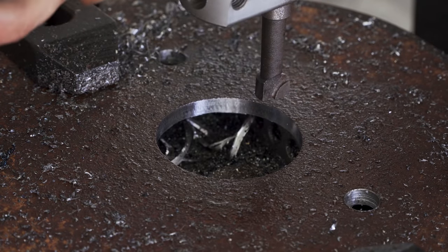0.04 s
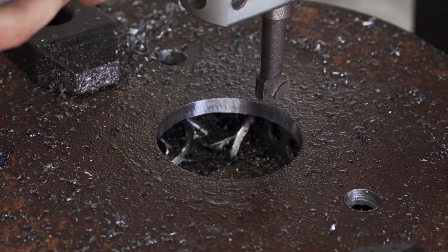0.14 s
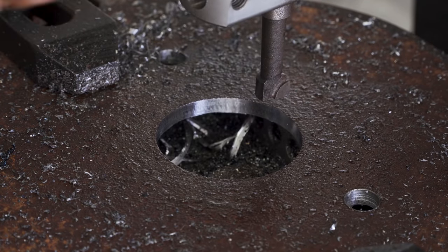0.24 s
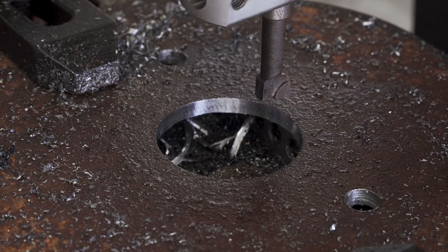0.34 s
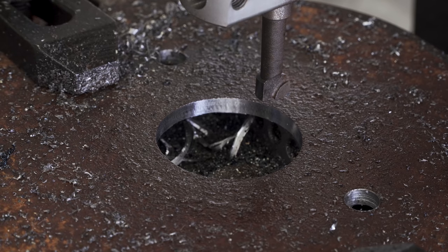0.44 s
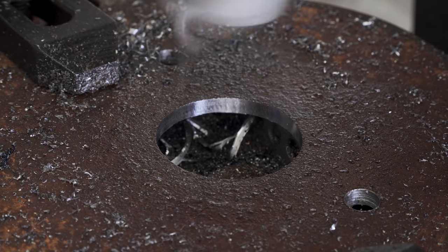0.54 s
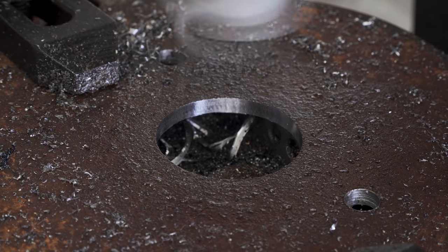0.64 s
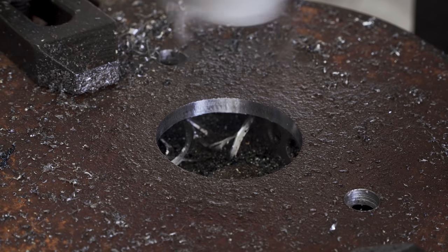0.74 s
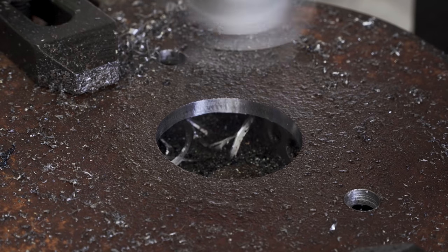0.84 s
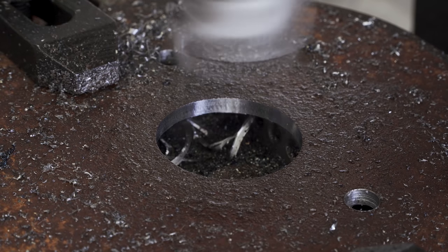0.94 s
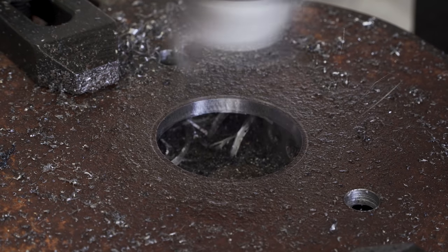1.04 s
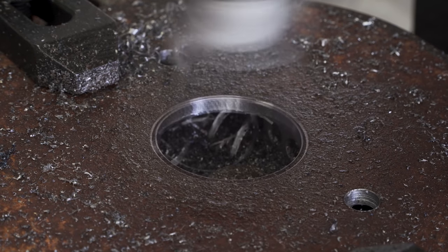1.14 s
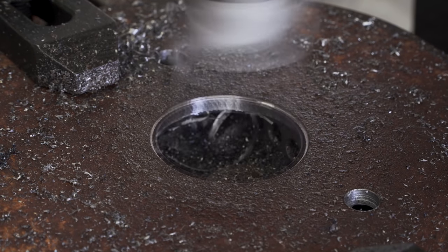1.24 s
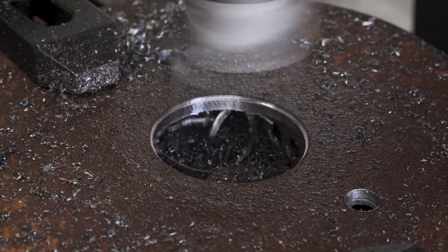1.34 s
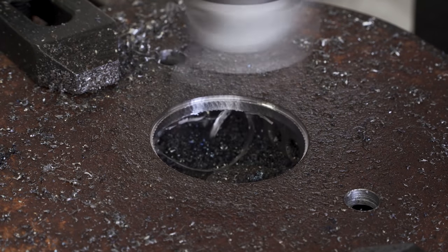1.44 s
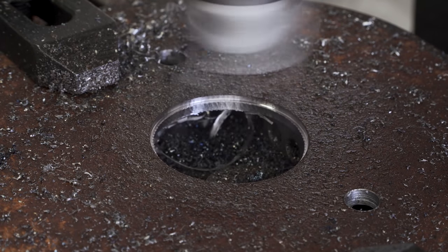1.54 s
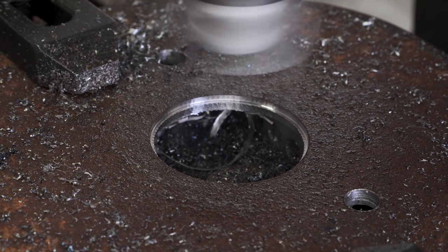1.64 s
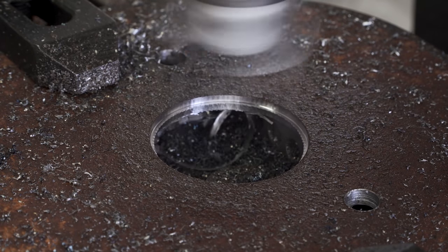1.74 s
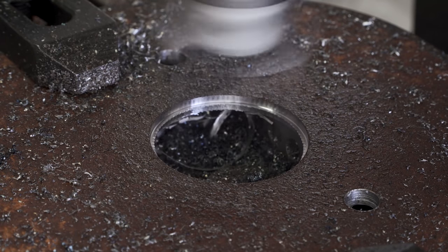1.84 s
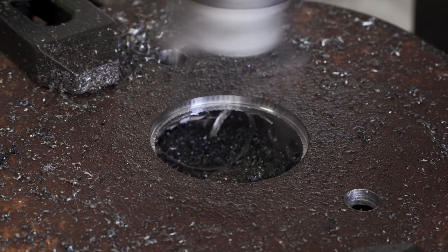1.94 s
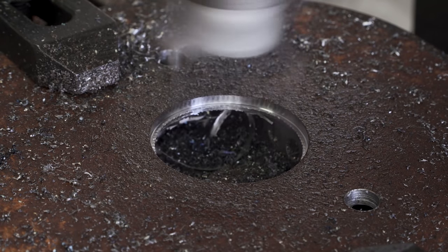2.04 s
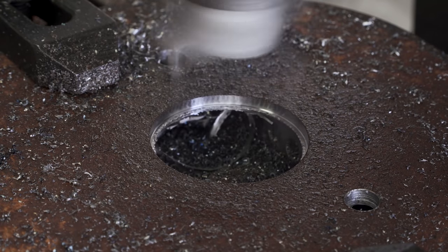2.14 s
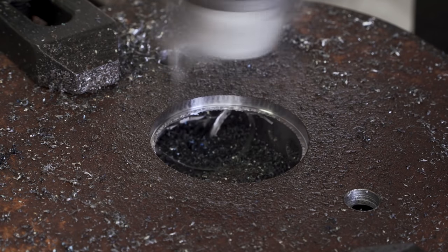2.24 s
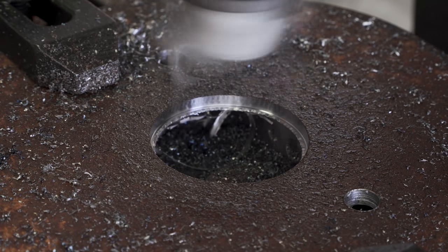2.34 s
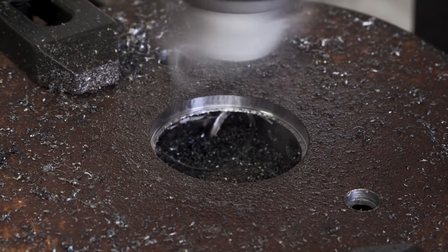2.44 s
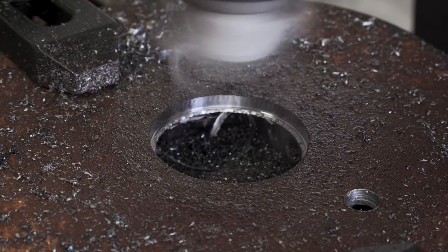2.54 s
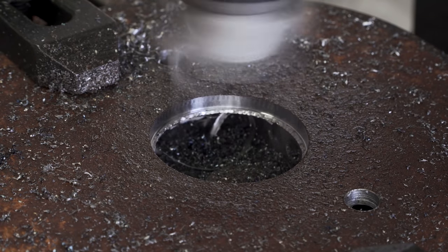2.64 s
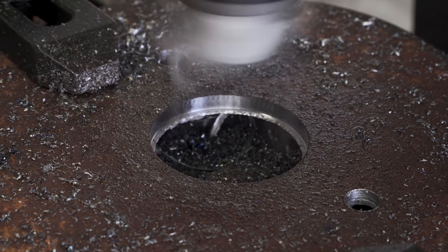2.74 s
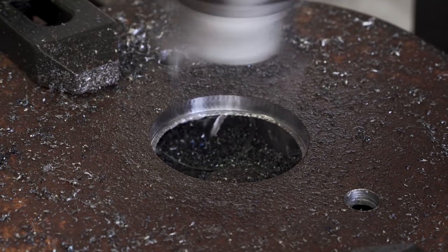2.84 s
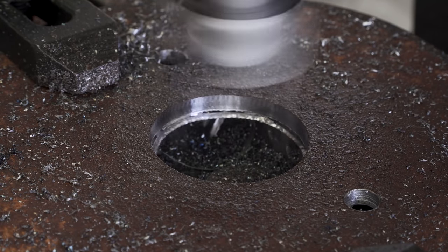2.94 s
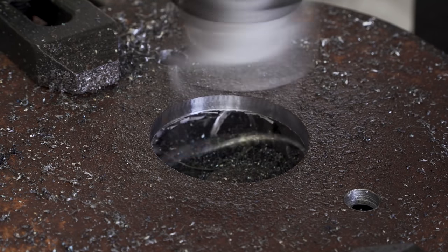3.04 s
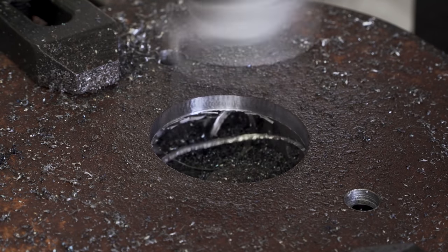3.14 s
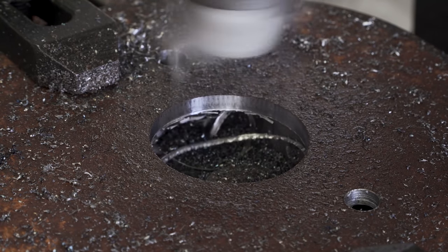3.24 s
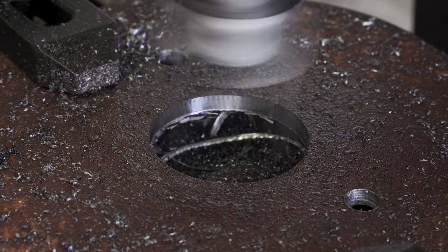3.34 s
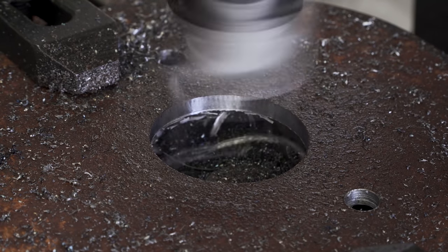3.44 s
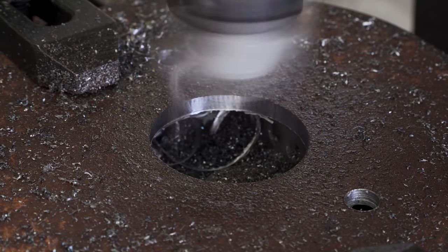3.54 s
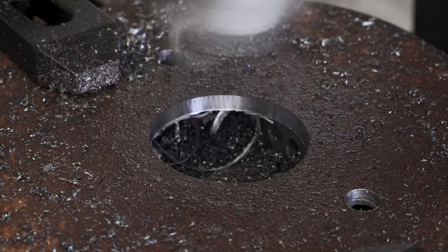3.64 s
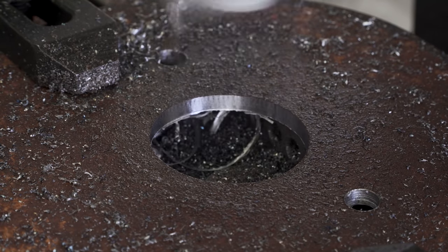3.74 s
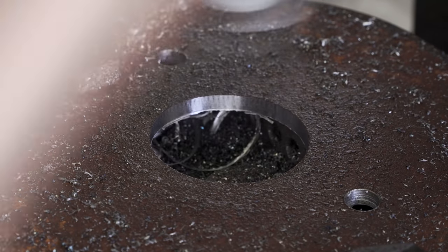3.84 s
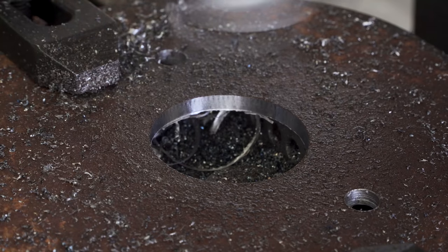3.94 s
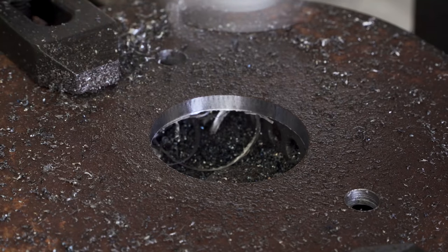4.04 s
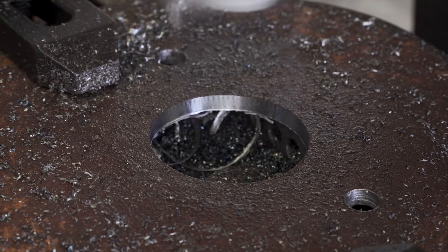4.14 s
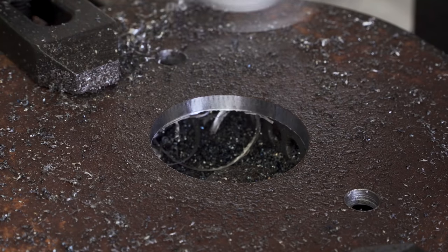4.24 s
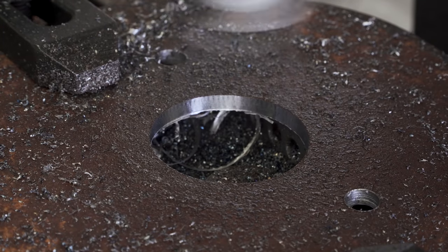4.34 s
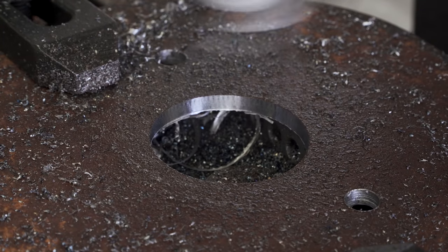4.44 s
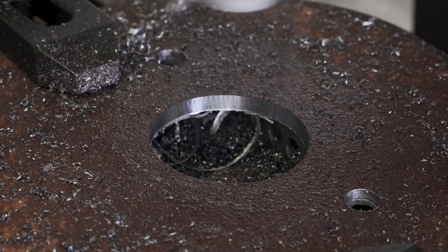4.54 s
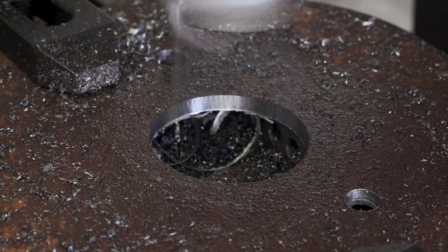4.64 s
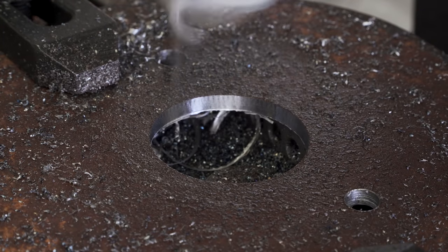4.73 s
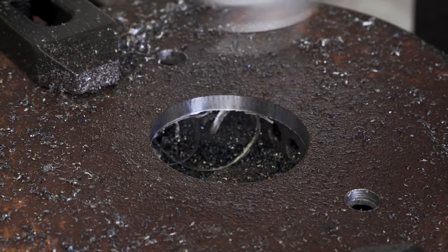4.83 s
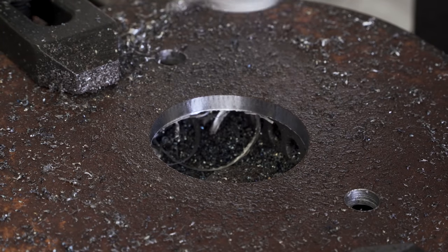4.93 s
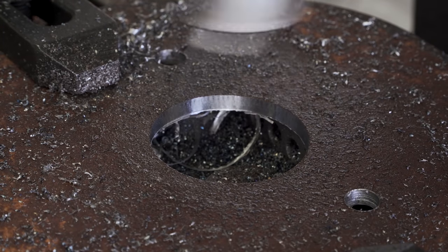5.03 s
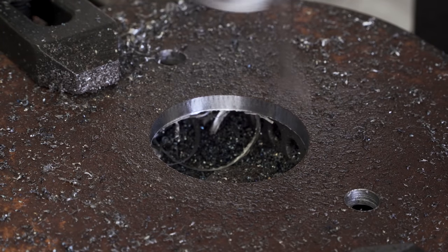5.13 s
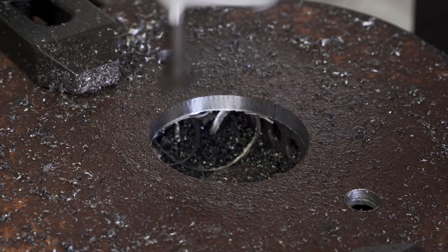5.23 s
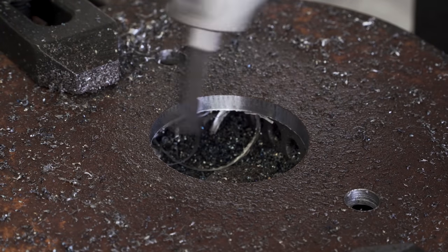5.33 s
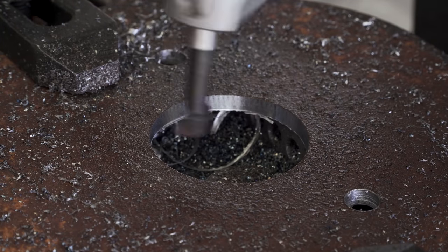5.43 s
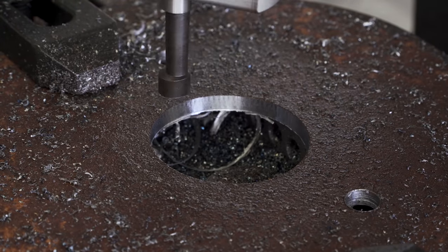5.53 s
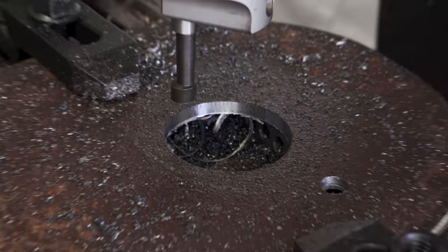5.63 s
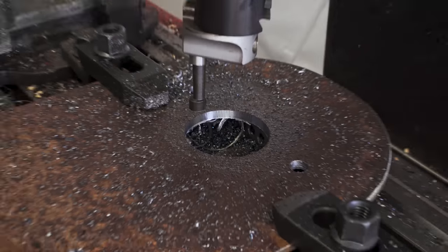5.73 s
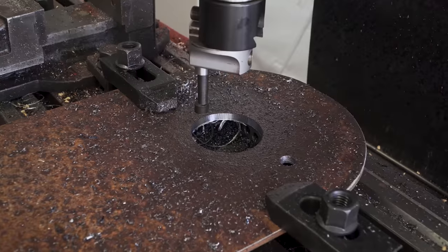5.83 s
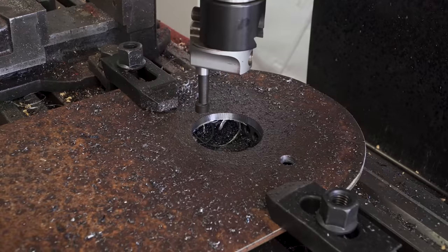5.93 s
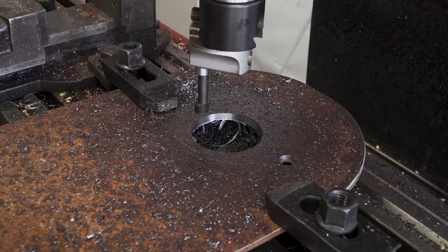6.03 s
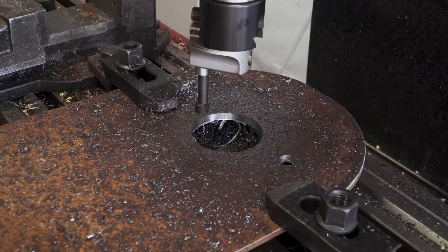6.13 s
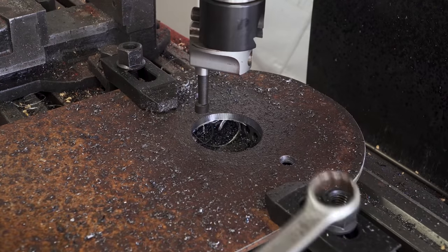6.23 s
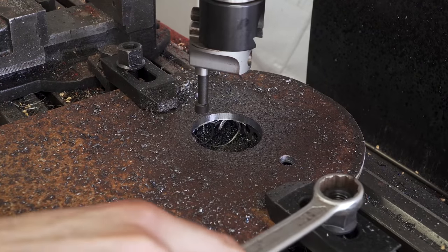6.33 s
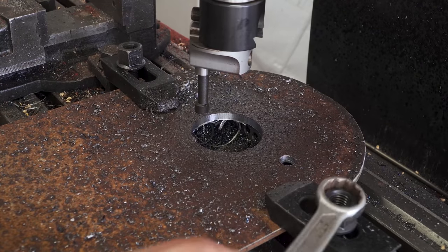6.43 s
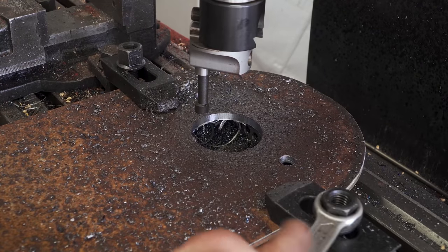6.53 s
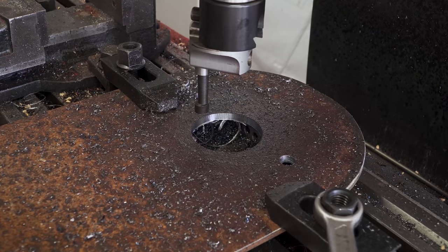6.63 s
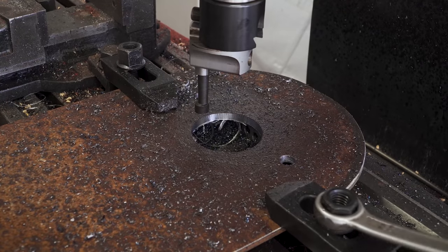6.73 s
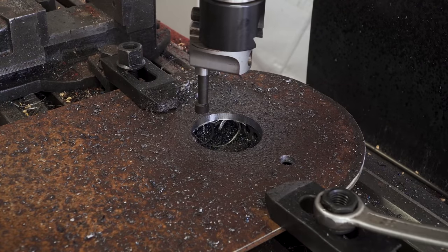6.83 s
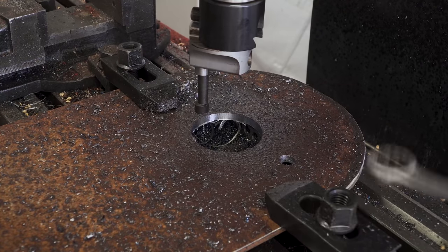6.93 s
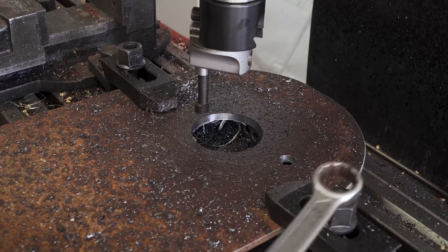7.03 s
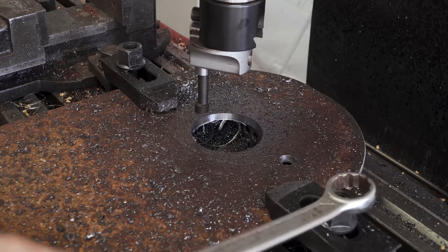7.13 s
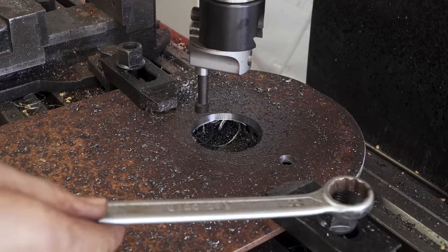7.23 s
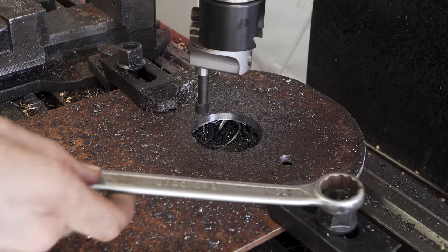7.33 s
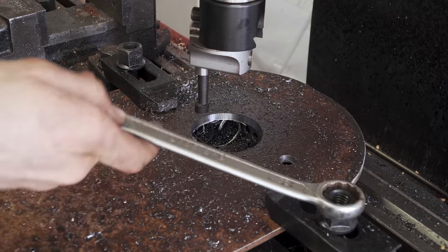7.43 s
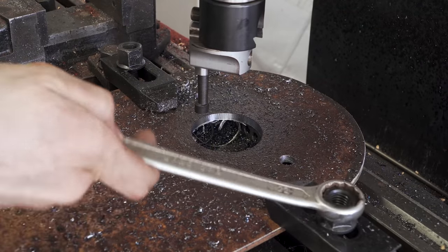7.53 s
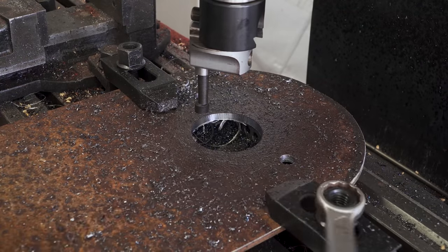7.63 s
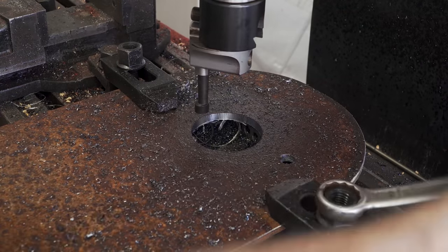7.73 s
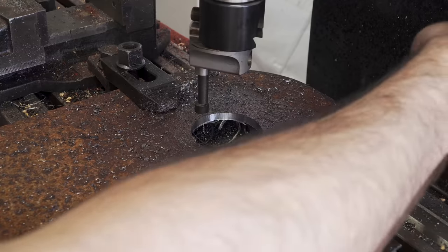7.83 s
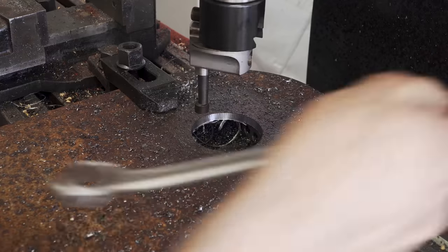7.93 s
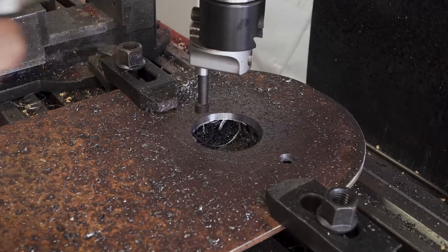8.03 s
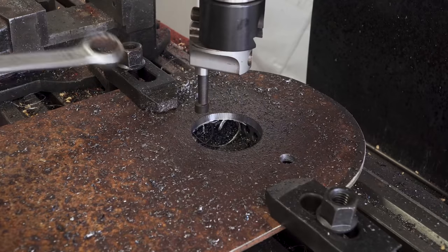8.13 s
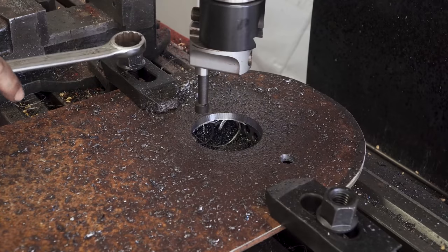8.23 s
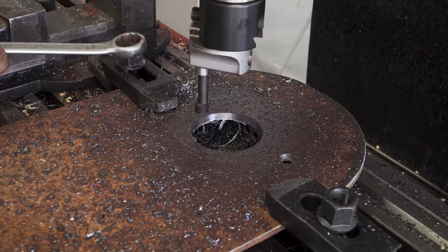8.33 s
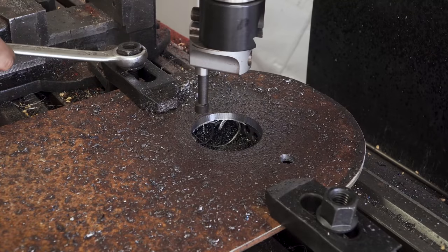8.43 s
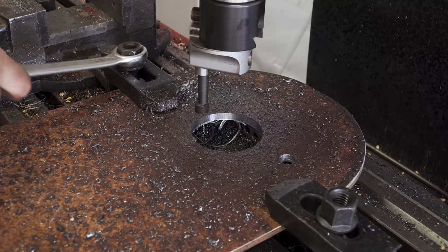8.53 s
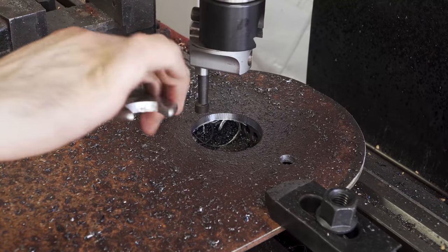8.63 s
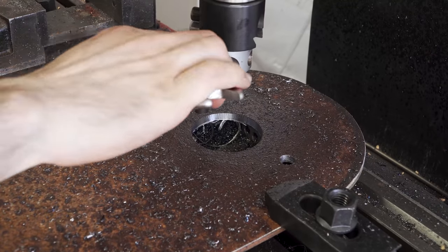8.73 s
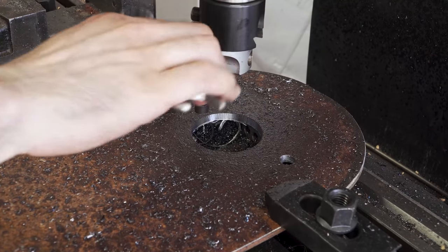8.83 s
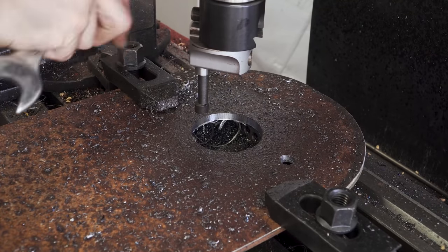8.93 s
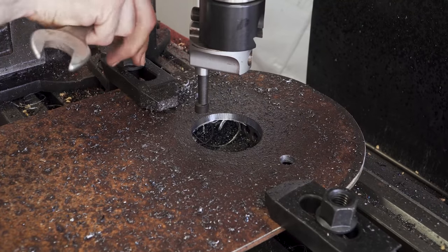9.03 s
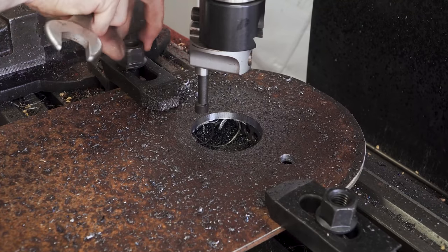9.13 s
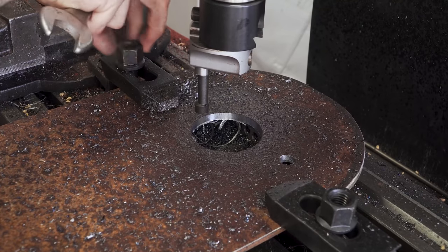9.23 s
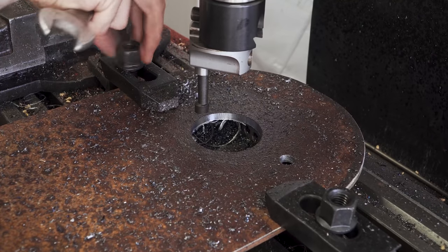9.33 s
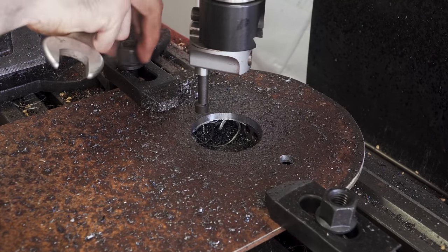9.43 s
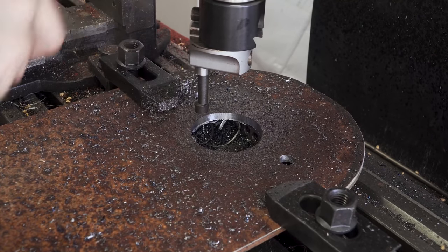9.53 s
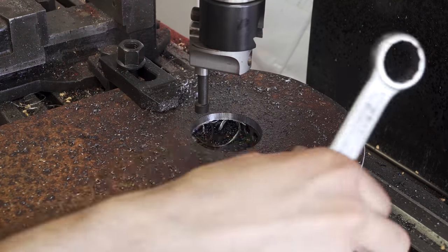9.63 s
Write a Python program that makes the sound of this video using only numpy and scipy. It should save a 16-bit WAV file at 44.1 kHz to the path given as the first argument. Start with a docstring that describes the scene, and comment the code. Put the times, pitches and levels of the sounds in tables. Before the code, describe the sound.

A geared milling spindle jolts on, bores steel with a high squeal, coasts down howling, then a low rumble and bright spanner clinks on clamp nuts.

```python
"""A small workshop, heard close and almost mono: a geared milling spindle jolts into motion, bores a steel plate
with a high squeal and coasts to a stop. One motor speed steers its mesh tones, gear noise, squeal and howls.
A short low rumble follows, made of a wavering tone and low noise. Then a ring spanner is fitted to the clamp
nuts: clinks made of ringing modes and dense noise, a singing shank and faint sliding friction.
Workshop air and a faint hum lie beneath."""
import sys
import numpy as np
from scipy import signal
from scipy.fft import rfft, irfft
from scipy.io import wavfile

SR = 44100
rng = np.random.default_rng(int(sys.argv[2]) if len(sys.argv) > 2 else 0)


def waveform_to_disk(signal):
    """Save audio, clipped to [-1, 1], as 16-bit WAV at the path in sys.argv[1]."""
    frames = np.transpose(np.atleast_2d(signal))
    scaled = np.clip(frames, -1, 1) * 32767
    samples = np.round(scaled).astype(np.int16)
    wavfile.write(sys.argv[1], SR, samples)


N = 426447
T = np.arange(N) / SR
HZ = np.fft.rfftfreq(N, 1 / SR)


def amp(db):
    """Decibels to gain."""
    return 10 ** (np.asarray(db) / 20)


def unit(x):
    """Scales to rms 1."""
    return x / np.sqrt(np.mean(x ** 2) + 1e-20)


def read(points, hz):
    """Reads a spectrum table on a log-frequency axis."""
    f, value = np.transpose(points)
    return np.interp(np.log(hz + 1), np.log(f + 1), value)


def during(start, end, fade=0.0096):
    """1 between two times, with ramps inside."""
    return np.clip((T - start) / fade, 0, 1) * np.clip((end - T) / fade, 0, 1)


def ramp(start, length):
    """Rises from 0 to 1."""
    return np.clip((T - start) / max(length, 1e-4), 0, 1)


def envelope(start, attack, hold, release):
    """Attack, hold and release in seconds, from 0 to 1 and back."""
    return ramp(start, attack) - ramp(start + attack + hold, release)


def coloured(x, db):
    """Filters by a gain at each frequency; rms 1."""
    return unit(irfft(rfft(x) * amp(db), N))


def band(x, lo_hz, hi_hz):
    """Band-pass without delay."""
    edges = [lo_hz, min(hi_hz, SR / 2 - 1)]
    return signal.sosfiltfilt(signal.butter(4, edges, "band", fs=SR, output="sos"), x)


def drift(rate_hz):
    """Slow random motion of rms 1."""
    return unit(irfft(rfft(rng.standard_normal(N)) * np.exp(-(HZ / rate_hz) ** 2), N))


def wander(knots):
    """Two random curves, straight between knots: one for level, one for phase."""
    return [np.interp(T, knots, v) for v in rng.standard_normal((2, len(knots)))]


def add(mix, s, sound):
    """Mixes a sound in at a time."""
    part = mix[max(round(s * SR), 0):][:len(sound)]
    part += sound[:len(part)]


# motor switched on, switched off, spindle silent
ON_S, OFF_S, REST_S = .561, 4.3, 5.585
# speed running free and in the cut, in turns per second
FREE_HZ, LOADED_HZ = 132.65, 129.4
# mesh tones running free, high and low: [pitch_hz, level_db (relative)]
FREE_TONES = [(398.4, -57.5), (495.3, -58.5), (791.3, -40.5), (1680, -54), (3068, -45.5), (3171, -49.5),
              (3268, -55), (3418, -49), (3736, -62.5), (3935, -45), (4221, -58.5), (4484, -40.5),
              (4619, -47.5), (5259, -40.5), (5572, -44), (5701, -43.5), (5766, -54.5), (5835, -71),
              (5970, -49.5), (6368, -46), (6788, -59), (7472, -63.5), (7607, -50.5), (7736, -61),
              (9157, -51.5), (10325, -46.5)]
LOW_TONES = [(199, -70.5), (595, -58.5), (694, -62), (892, -70.5), (991, -61)]
# mesh tones under load: [pitch_hz, level_db (relative)]
LOAD_TONES = [(388, -63), (485, -64.5), (781, -50), (2993, -52.5), (3397, -51), (3844, -60), (4113, -48),
              (4371, -47.5), (4511, -41.5), (4996, -47), (5125, -63.5), (5696, -47.5), (6379, -59),
              (6514, -39.5), (6634, -46.5), (7435, -55), (7564, -83)]


def spindle(tone_opening_db=16, free_db=-2.5, loaded_db=2):
    """One motor speed drives the gear tones, the gear noise and the cut."""
    load = envelope(start=1.1, attack=.1, hold=1.48, release=.24)
    # the opening is much louder, sinking slightly, then the level drops
    opening_level = envelope(start=0.5375, attack=0.057, hold=0.513, release=0.098) * (1 - 0.29 * (T - ON_S))
    speed = motor_speed(load)
    turns = np.cumsum(speed * (1 + 0.00032 * drift(12))) / SR
    # the mesh tones sound only while the motor drives the teeth
    strength = amp(tone_opening_db * opening_level) * during(0.613, 4.36, 0.055)
    free = amp(free_db) * (1 - load) * gear_tones(FREE_TONES + LOW_TONES, turns, FREE_HZ, flutter=0.17)
    loaded = amp(loaded_db) * load * gear_tones(LOAD_TONES, turns, LOADED_HZ, flutter=0.62)
    # late in the free run the gears grow 2.5 dB louder
    late_lift = amp(2.5 * ramp(3.92, .2))
    gears = (gear_noise(turns, speed, opening_level, load) + strength * (free + loaded)) * late_lift
    settle_s = 0.27
    turning = ramp(ON_S, .01) - ramp(REST_S - settle_s, settle_s)
    return (gears + howls(turns) + whines(turns)) * turning + cutter(turns, load) + jolt()


def motor_speed(load, run_up_s=.018, drag_s=2.5, friction_hz_per_s=69.2):
    """Turns per second: a quick run-up, a sag in the cut, then oil drag and dry friction; never under 1."""
    run_up = 1 - np.exp(-np.maximum(T - ON_S, 0) / run_up_s)
    driven = run_up * (FREE_HZ + (LOADED_HZ - FREE_HZ) * load)
    friction = friction_hz_per_s * drag_s
    return np.maximum((driven + friction) * np.exp(-np.maximum(T - OFF_S, 0) / drag_s) - friction, 1)


def gear_tones(tones, turns, running_hz, flutter=.35):
    """Mesh tones follow the motor; the high ones flutter most as the teeth seat unevenly."""
    knots = np.arange(0, T[-1] + .1, 1 / 40)
    out = np.zeros(N)
    for hz, db in tones:
        swell, slip = wander(knots)
        depth = flutter * np.clip(hz / 2500, .5, 1)
        phase = 2 * np.pi * (hz / running_hz * turns + rng.random())
        out += amp(db) * (1 + depth * swell) * np.cos(phase + depth * slip)
    return np.sqrt(2) * out


# gear noise as rattle, mesh and fizz: [from_hz, to_hz, level_db (relative, running free), opening_db, cutting_db,
# slack_db (the last three are added at full opening level, load or slack), speed_power (exponent)]
GEAR_BANDS = [(60, 2360, -42.5, 17.5, -1.5, 0.5, -0.4), (1960, 6180, -33, 17.5, -1.5, 5, 1.04),
              (6210, 19000, -38.5, 16, 4, 1.5, 1.4)]


def gear_noise(turns, speed, opening_level, load, grain_db=0.5, flicker_db=0.57, throb=0.14, ripple_db=3.0):
    """A dense hail of tooth impacts, throbbing once a turn, rings the casing; slower gears hiss less."""
    roughness = amp(grain_db * drift(700) + flicker_db * drift(40))
    impacts = rng.standard_normal(N) * roughness * (1 + throb * np.cos(2 * np.pi * turns))
    # countless small modes ripple the response
    knots = np.arange(0, SR / 2, 25)
    ripple = ripple_db * np.interp(HZ, knots, rng.standard_normal(len(knots)))
    ring = coloured(impacts, casing_db(HZ) + ripple)
    # unpowered, the teeth go slack
    slack = ramp(OFF_S, .33)
    out = np.zeros(N)
    for lo_hz, hi_hz, db, opening_db, cut_db, slack_db, power in GEAR_BANDS:
        level_db = db + opening_db * opening_level + cut_db * load + slack_db * slack
        out += amp(level_db) * (speed / FREE_HZ) ** power * unit(band(ring, lo_hz, hi_hz))
    return out


# the casing's broad colour: [pitch_hz, level_db (relative, per Hz)]
CASING = [(59, -61.5), (100, -29), (358, -34), (389, -15.5), (705, -14), (784, -3), (1030, -9),
          (1720, -8.5), (2220, -13), (3860, -2.5), (4110, -2), (5420, -4), (8640, -16), (10500, -20),
          (16000, -36)]
# the casing's resonances: [pitch_hz, width_hz, boost_db]
CASING_MODES = [(773, 21, 4), (930, 53, 4.5), (1097, 65, 3.3), (1370, 26, 1), (1560, 80, 3.8),
                (2467, 70, 8.1), (2705, 130, 8.5), (2948, 150, 5.7), (3700, 260, 6.2), (3840, 90, 5.3),
                (4310, 200, 4.1), (5144, 265, 3.5), (5750, 190, 1.9), (6330, 460, 3), (7600, 80, 1.9),
                (10400, 270, 4.1)]


def casing_db(hz):
    """The casing's response: a broad colour with resonances on it."""
    return read(CASING, hz) + sum(db / (1 + (2 * (hz - f) / width) ** 2) for f, width, db in CASING_MODES)


# partials of the tool's squeal: [multiple (of the motor speed), level_db (relative)]
SQUEAL = [(92, -21), (93, -14), (94, -5), (95, -3), (96, -3), (97, 0), (98, -14), (99, -20)]
# when the tool squeals: [start_s, attack_s, hold_s, dying_s, level_db (before flicker and rasp)]
SQUEALS = [(1.038, 0.079, 0.71, .1, -24), (3.15, 0.025, .005, 0.011, -36.5), (3.25, 0.022, .01, 0.077, -38),
           (3.67, 0.02, .005, 0.0089, -37)]
# the tip brushes the rim on its way out: [start_s, attack_s, hold_s, hiss_db, hum_db]
BRUSHES = [(2.682, 0.33, .04, -40, -80), (3.123, 0.014, 0.041, -47, -60), (3.255, .015, 0.13, -47.5, -56.5),
           (3.653, .015, 0.029, -46, -62)]


def cutter(turns, load, sweep=0.4, rasp_db=-9, dying=1.54, cut_hum_db=-54.5):
    """The boring bar squeals in one short chirp a turn; the load hums and the tip brushes the rim."""
    angle = 2 * np.pi * turns
    # phases growing with the square of the order spread each pulse into a chirp
    partials = [amp(db) * np.cos(round(k) * angle + sweep * (i - len(SQUEAL) / 2) ** 2)
                for i, (k, db) in enumerate(SQUEAL)]
    rasp = unit(band(rng.standard_normal(N), 12000, 12750) * (1 + np.cos(angle)))
    squeal = unit(sum(partials)) * amp(drift(40.6)) + amp(rasp_db) * rasp
    hum = unit(np.cos(angle) + amp(-4.5) * np.sin(2 * angle)) * amp(0.89 * drift(25))
    hiss = unit(band(rng.standard_normal(N), 11600, 15800) * (1 + 0.56 * np.cos(angle)))
    out = amp(cut_hum_db) * load * hum
    for start, attack, hold, dying_s, db in SQUEALS:
        after = np.maximum(T - start - attack - hold, 0)
        out += amp(db) * ramp(start, attack) / (1 + after / dying_s) ** dying * squeal
    for start, attack, hold, hiss_db, hum_db in BRUSHES:
        touch = envelope(start, attack, hold, release=.02)
        out += touch * (amp(hiss_db) * hiss + amp(hum_db) * hum)
    return out * during(ON_S, OFF_S)


def jolt(start=.561, t60=0.19):
    """The gears take up their slack with one bang: coloured noise with a sharp onset and a decay."""
    age = np.maximum(T - start, 0)
    colour = [(100, -30.5), (280, -6.5), (600, -4), (850, 2.5), (1500, -4), (2700, 3.5),
              (5000, -10.5), (9000, -21.5), (16000, -42.5)]  # Hz, dB
    bang = coloured(rng.standard_normal(N), read(colour, HZ))
    return amp(-11.0) * bang * np.minimum(age / 0.00072, 1) * amp(-60 * age / t60)


# howls of the back flanks: [multiple (of the motor speed), level_db (before swelling), loudest_s, spread_s]
HOWLS = [(1, -66, 4.45, .15), (3, -62, 4.35, .12), (4, -59, 4.4, .17), (6, -59, 4.75, .15),
         (24, -35, 4.6, .045), (24, -43, 4.55, .11), (36, -41, 4.52, .1), (43, -37, 4.45, .16),
         (43, -34, 4.69, .035), (47, -40, 4.72, .08), (52, -42, 4.55, .2), (57, -39, 4.65, .15)]


def howls(turns):
    """Unpowered, the gears howl on their back flanks: rough, falling tones swell and fade."""
    knots = np.arange(0, T[-1] + .1, 1 / 90)
    out = np.zeros(N)
    for multiple, db, s, spread in HOWLS:
        swell, slip = wander(knots)
        size = amp(db + 2 * swell) * np.exp(-((T - s) / spread) ** 2 / 2)
        out += size * np.cos(2 * np.pi * multiple * turns + .7 * slip)
    return np.sqrt(2) * out * during(4.3, 5.4, .05)


def whines(turns, count=64, uneven_db=5, rough=0.58, level_db=-37.5):
    """Slack tooth errors repeat every turn: multiples of the speed glide down through the casing's resonances."""
    sizes = amp(uneven_db * rng.standard_normal(count)) * np.exp(2j * np.pi * rng.random(count))
    one_turn = irfft(np.append(0, sizes), 4096)
    errors = np.interp(turns % 1, np.arange(len(one_turn)) / len(one_turn), one_turn)
    whine = coloured(errors * (1 + rough * drift(40)), casing_db(HZ))
    return amp(level_db) * envelope(start=4.3, attack=0.064, hold=0.48, release=0.66) * whine


# steel touching steel, mostly the spanner: [start_s, level_db (peak, taken as 11 dB above the first 5 ms' rms),
# low_db, treble_db (shares of the power aimed for), rebound_s (delay; only those over 3 ms sound)]
CLINKS = [(.108, -44, -10, -28, 0), (.1825, -42.5, -8, -30, 0), (5.623, -43, -11, -4, 0.0026),
          (6.32, -8.5, -33, -5.5, .0065), (6.3394, -19, -24, -16, 0.0091), (6.3764, -21, -23, -3, 0),
          (6.3849, -15, -16, -9, 0.0024), (6.3984, -14.5, -7.5, -20, 0), (6.4874, -15, -17, -21, 0),
          (6.4969, -5, -27, -11, 0.00072), (6.516, -4.5, -8.5, -15.5, 0.0063), (6.868, -22.5, 1, -23, 0),
          (6.906, -29, -6, -5, 0), (6.95, -11, -11.5, -13, 0), (7.0897, -7, -22, -5.5, .006),
          (7.1247, -14.5, -10.5, -5, 0.0052), (7.148, -16, -13, 0, 0), (7.1696, -18, -10, -12, 0.019),
          (7.32, -20, -11, -7, 0.0064), (7.3326, -7, -10, -9.5, 0.0083), (7.3696, -17, -11, -25, 0.0055),
          (7.4114, -16.5, -1, -29.5, 0.0066), (7.453, -18, -13, -15.5, 0), (7.4701, -6, -11, -16, 0.011),
          (7.527, -10.5, -4.5, -16.5, 0), (7.5585, -30.5, 2, -13, 0.0054), (7.8445, -27.5, -3, -16, 0.015),
          (7.886, -14, 7, -17, 0.0025), (8.244, -9.5, -30, -8, 0.0075), (8.299, -31.5, -13, -17, 0.013),
          (8.3389, -9.5, -11, -27, 0.0047), (8.3543, -14, 10, -19.5, 0.0013), (8.386, -11.5, -27, -15, 0),
          (8.4082, -8, -11, -25, 0), (8.4769, -13.5, -25, -14, 0), (8.48, -4, -32, -6.5, 0.0058),
          (8.525, -25, -3, -13, 0), (8.5648, -31, 7, -31, .01), (8.843, -30.5, 0, -7.5, 0.0023),
          (8.8823, -22, -9, -2, 0), (8.8912, -15.5, -11, -9, 0), (9.136, -34, -11, -17, 0.0088),
          (9.187, -12, -7.5, -11.5, .006), (9.2686, -25.5, -11, -16, 0), (9.284, -21, -15, -13, .015),
          (9.3424, -25.5, -15, -26, 0.0032), (9.3572, -11.5, -18, -13.5, 0.0013),
          (9.4019, -15, -14, -14, 0.0032), (9.5076, -16, -15.5, -12.5, 0.013)]
# the spanner's modes in each hold: [pitch_hz, width_hz, level_db (relative)]
ON_FRONT_NUT = [(2017, 53, -9), (2490, 29, -1), (2760, 32, -16), (3500, 60, -7.5), (3550, 58, -13),
                (3814, 73, -1.5), (4330, 54, -17), (4840, 84, -14), (5600, 180, -8.5), (6440, 51, -1.5),
                (6890, 120, -7), (7590, 93, -17.5), (8470, 98, -18), (9000, 34, -27), (9150, 67, -21),
                (10030, 160, -13), (11400, 110, -14), (12380, 130, -25)]
TURNED_OVER = [(800, 13, -16.5), (1823, 69, -15), (2515, 38, -13.5), (3274, 85, 1), (3770, 110, -24),
               (4000, 39, -37), (4780, 41, -50), (4840, 98, -5.5), (5600, 69, -6), (6500, 120, -9),
               (7140, 87, -10), (7730, 130, -15), (8400, 200, -23), (8960, 250, -7.5), (9400, 150, -10),
               (9870, 55, -26), (11100, 33, -24), (11450, 130, -13)]
ON_REAR_NUT = [(1110, 20, -9.5), (2314, 70, 6.5), (3155, 120, -2), (3730, 140, -7.5), (4600, 300, -6),
               (5540, 180, -4.5), (5770, 57, -3.5), (5890, 98, 3.5), (6250, 180, 2.5), (6790, 145, 3.5),
               (6900, 13, -21), (7310, 37, -18), (7620, 93, -4), (8640, 170, -2), (9200, 29, -10),
               (9570, 200, -1), (10600, 40, -14.5), (11060, 110, -2), (11800, 200, -11), (13150, 130, -12)]
OPEN_END = [(770, 21, -13), (1046, 26, -12.5), (1970, 88, -1.5), (2530, 51, -3), (3050, 220, -10),
            (3950, 85, -14), (5080, 68, -8), (5450, 87, -24), (6300, 66, -9), (6500, 72, 5),
            (7120, 220, 0.5), (7800, 47, -10), (8300, 110, 4), (9100, 44, -21), (9150, 150, 2),
            (11200, 120, -10), (12400, 68, -21), (12600, 60, -19)]
# the spanner rings differently with each new hold: [start_s, modes]
HOLDS = [(0, ON_FRONT_NUT), (6.8, TURNED_OVER), (7.8, ON_REAR_NUT), (9.1, OPEN_END)]
# dense ringing of nut, clamp and plate: [pitch_hz, level_db (relative, per Hz)]
FRONT_CLAMP = [(240, -64), (400, -38.5), (520, -58), (789, -6.5), (906, -41), (1490, -30), (2470, -6),
               (2840, -19.5), (3260, -3), (6050, -15), (9610, -11.5), (14100, -22), (16000, -47)]
REAR_CLAMP = [(240, -62.5), (400, -21), (553, -23), (789, -18), (1630, -17.5), (2250, -3), (2670, -8.5),
              (3160, -9), (4950, -14.5), (5870, -9.5), (8900, -10), (13900, -18), (16000, -34.5)]
LEAD = SR // 60  # samples of grazing before a contact


def spanner():
    """Clinks, some with a quick rebound, the singing shank and faint sliding."""
    out = np.zeros(N)
    for s, db, low_db, treble_db, rebound_s in CLINKS:
        modes = [m for start, m in HOLDS if start <= s][-1]
        clamp = FRONT_CLAMP if s < HOLDS[2][0] else REAR_CLAMP
        add(out, s - LEAD / SR, clink(db, low_db, treble_db, modes, clamp))
        if rebound_s > .003:
            # a rebound is weaker
            rebound = clink(db - 1.5, low_db, treble_db + 0.5, modes, clamp)
            add(out, s + rebound_s - LEAD / SR, rebound)
    return out + shank() + rubs()


def clink(db, low_db, treble_db, modes, clamp, clamp_t60=0.062, ring=4.8, ring_db=2, tick_db=-2,
          graze_db=-9, bloom_db=7, crest_db=11.0):
    """One contact: a graze, a sharp tick, the clamp's dense short ring and the spanner's own modes."""
    t = np.arange(-LEAD, SR // 3) / SR
    age, hz = np.maximum(t, 0), np.fft.rfftfreq(len(t), 1 / SR)
    f, width, mode_db = np.transpose(modes)[:, :, None]
    blow = amp(-60 * age / clamp_t60) + amp(tick_db) * np.exp(-age / 0.0005)
    force = np.where(t < 0, amp(graze_db) * np.exp(-abs(t) / 0.0024), blow)
    # the chatter of the contact is coloured by the spanner too
    bloom = bloom_db * np.max(1 / (1 + ((hz - f) / (2.0 * width)) ** 2), axis=0)
    chatter = rfft(rng.standard_normal(len(t)) * force)
    dense = unit(irfft(chatter * amp(read(clamp, hz) + bloom), len(t)))
    # narrow modes ring longest; every contact excites them a little differently
    sizes = amp(mode_db + 2 * rng.standard_normal(f.shape)) * width
    waves = np.exp(-np.log(1000) * age * width / ring) * np.sin(2 * np.pi * f * age)
    tones = unit(np.sum(rng.choice([-1, 1], f.shape) * sizes * waves, axis=0))
    spectrum = rfft(dense + amp(ring_db) * tones)
    # a harder contact is brighter, a flatter one rings lower
    power = abs(spectrum) ** 2 / np.sum(abs(spectrum) ** 2)
    low_now = 10 * np.log10(power[(hz > 1500) & (hz < 2800)].sum())
    treble_now = 10 * np.log10(power[(hz > 7000) & (hz < 15000)].sum())
    low_gain = np.clip(low_db - low_now, -12, 12)
    treble_gain = np.clip(treble_db - treble_now, -15, 12)
    tilt = read([(250, -19), (700, -3.0), (1000, -2), (2300, low_gain), (3300, 2.5), (5000, -2),
                 (8500, treble_gain)], hz)
    sound = irfft(spectrum * amp(tilt), len(t))
    return amp(db - crest_db) * sound / np.std(sound[LEAD:LEAD + SR // 200])


# blows that set the loosely held shank singing: [start_s, level_db]
SHANK_BLOWS = [(6.32, -45), (6.398, -37), (6.519, -31)]
# its modes: [pitch_hz, level_db (relative to the blow), t60_s]
SHANK_MODES = [(2467, -1, 0.82), (6520, -10, 0.25)]


def shank(gripped_s=6.645, grip_s=0.032):
    """Each blow starts the shank's ring afresh, until the hand closes on it and stops it."""
    out = np.zeros(N)
    for s, db in SHANK_BLOWS:
        age, struck = np.maximum(T - s, 0), ramp(s, .002)
        ring = sum(amp(db + mode_db - 60 * age / t60) * np.sin(2 * np.pi * hz * age)
                   for hz, mode_db, t60 in SHANK_MODES)
        out = out * (1 - struck) + np.sqrt(2) * ring * struck
    return out * (1 - ramp(gripped_s - grip_s, grip_s))


# steel and hand sliding on steel: [start_s, length_s, pitch_hz (centre), width_hz, level_db (before tapering)]
RUBS = [(6.15, 0.059, 970, 890, -50), (6.195, .045, 7000, 12000, -48.5), (6.269, 0.041, 6960, 12100, -47.5),
        (6.33, 0.68, 7500, 14000, -60.5), (6.664, 0.22, 3750, 600, -60), (6.687, 0.041, 7040, 12000, -48.5),
        (7.095, 0.13, 3300, 300, -37), (7.098, 0.075, 9700, 1100, -33.5), (7.297, 0.11, 3250, 300, -46),
        (7.27, 0.72, 7500, 14000, -57), (7.597, 0.22, 3840, 800, -54.5), (7.6, 0.14, 8950, 800, -68),
        (8.059, .16, 7400, 1000, -63), (8.263, 0.067, 3090, 300, -43), (8.464, 0.29, 7440, 14200, -59.5),
        (8.871, .051, 2680, 900, -41), (9.105, .11, 137, 80, -64), (9.111, 0.16, 7400, 14000, -53),
        (9.167, .034, 3200, 1400, -38)]
# the colour of that friction: [pitch_hz, level_db (relative, per Hz)]
SCRAPE = [(1000, -3.5), (2500, 1), (3800, -3), (5500, -.5), (9000, -3), (15000, -15)]


def rubs(grain_db=2.5, taper=0.41):
    """Each rub is a swell of grainy friction noise, broad or in one resonance."""
    scrape = coloured(rng.standard_normal(N), read(SCRAPE, HZ)) * amp(grain_db * drift(200))
    out = np.zeros(N)
    for s, length, hz, width, db in RUBS:
        stretch = scrape[round(s * SR):][:round(length * SR)]
        noise = unit(band(stretch, max(hz - width / 2, 30), hz + width / 2))
        add(out, s, amp(db) * noise * signal.windows.tukey(len(noise), taper))
    return out


# the rumble's noise: [pitch_hz, level_db (relative, per Hz)]
RUMBLE_COLOUR = [(12, -44), (20, -22), (32, -3), (53, -1.5), (81, -18.5), (168, -21.5), (226, -19.5),
                 (377, -41.5), (500, -33), (650, -64), (1100, -120)]


def rumble(hz=47, lumps_db=-4.5, uneven_db=-1.0, crest_db=-35.5, arch_db=6.5):
    """A low, uneven shudder that swells and ebbs: a wavering tone with lumps of low noise."""
    angle = 2 * np.pi * np.cumsum(hz * (1 + 0.072 * drift(12.1))) / SR
    shudder = unit(np.sin(angle) + amp(-12) * np.cos(2 * angle))
    lumps = coloured(rng.standard_normal(N), read(RUMBLE_COLOUR, HZ))
    start, attack, hold, release = 5.585, .015, 0.443, 0.025  # s
    arch = np.sin(np.pi * ramp(start, attack + hold + release))
    level = amp(crest_db + arch_db * (arch - 1) + uneven_db * drift(21))
    return level * envelope(start, attack, hold, release) * (shudder + amp(lumps_db) * lumps)


# the colour of the workshop air: [pitch_hz, level_db (relative, per Hz)]
AIR = [(15, -30), (25, -1.5), (59, 1), (145, -5), (200, 1.5), (354, -6.5), (591, -6), (863, -7.5),
       (3250, -15.5), (5430, -22.5), (9570, -27), (11300, -28.5), (16000, -47.5)]
# its hum: [pitch_hz, level_db (relative)]
AIR_TONES = [(59.5, -69.5), (592, -71.5), (655, -71.5), (999, -75.5)]


def air(rest_db=-56.5, early_db=-2, sinks_s=2.2, sink_db_per_s=7):
    """Workshop noise with a faint hum; it sinks late in the machine's run and is back once it rests."""
    wash = amp(rest_db) * coloured(rng.standard_normal(N), read(AIR, HZ))
    hum = sum(amp(db + 1.5 + 2 * drift(2.1)) * unit(np.sin(2 * np.pi * hz * T)) for hz, db in AIR_TONES)
    sunk_db = early_db - sink_db_per_s * np.maximum(T - sinks_s, 0)
    return (wash + hum) * amp(sunk_db * (1 - ramp(REST_S - .03, 0.026)))


def workshop(x, t60=.25):
    """A short, sparse, diffuse tail: random taps that die away."""
    t = np.arange(SR // 2) / SR
    sparse = (rng.random(len(t)) < .06) * (t > .004)
    taps = rng.standard_normal(len(t)) * sparse * amp(-60 * t / t60)
    return signal.fftconvolve(band(x, 200, 9000), taps / np.linalg.norm(taps))[:N]


def scene():
    """Almost mono, with a very faint diffuse width."""
    tools = spanner()
    mid = spindle() + rumble() + tools + amp(-29) * workshop(tools, t60=.25) + air()
    side = amp(-40) * workshop(mid, t60=.1)
    return np.array([mid + side, mid - side])


def record(dry, edge_hz=16000):
    """Clips at full scale, then cuts everything above the band edge."""
    low_pass = signal.firwin(255, edge_hz, window=("kaiser", 9), fs=SR)
    return signal.oaconvolve(np.clip(dry, -1, 1), low_pass[None], "same")


dry = scene()
out = record(dry)
waveform_to_disk(out)
```